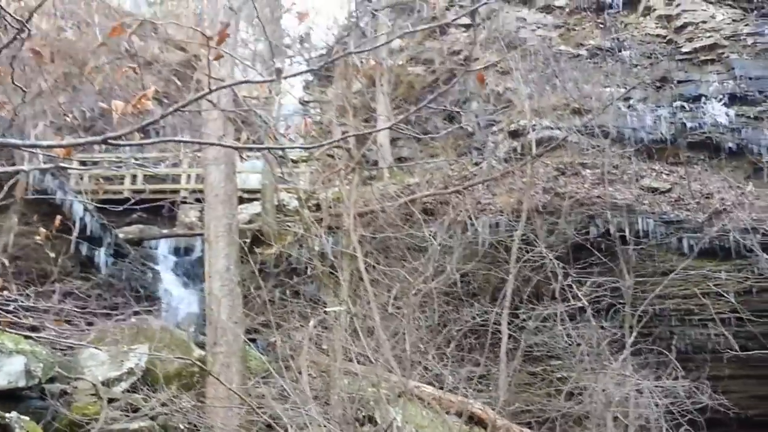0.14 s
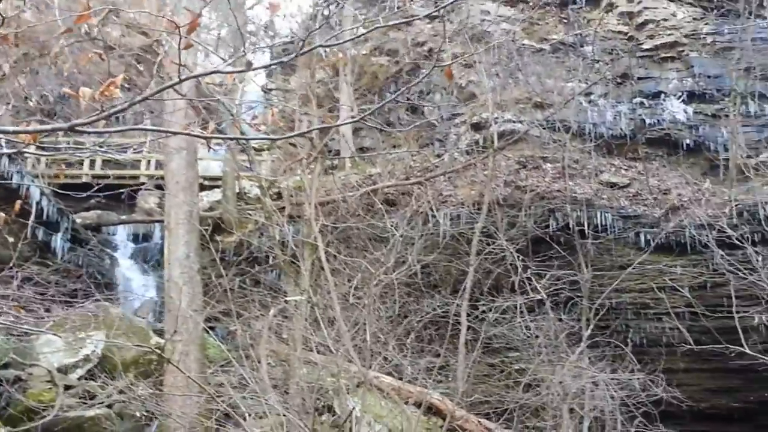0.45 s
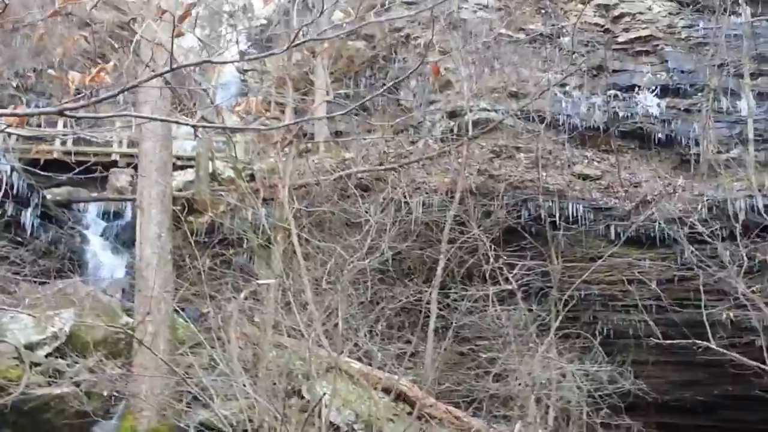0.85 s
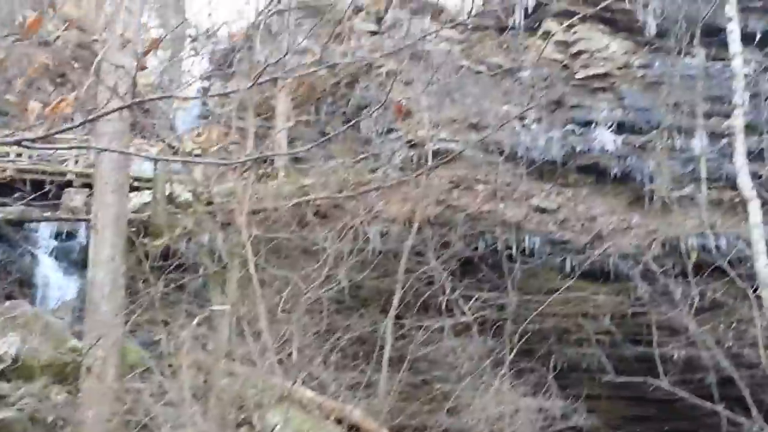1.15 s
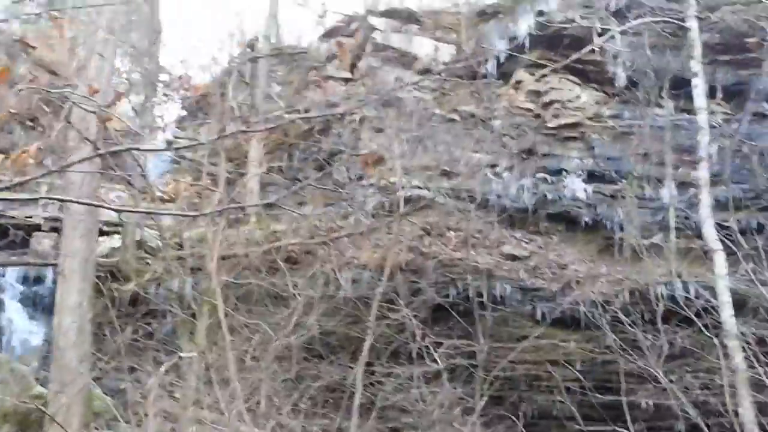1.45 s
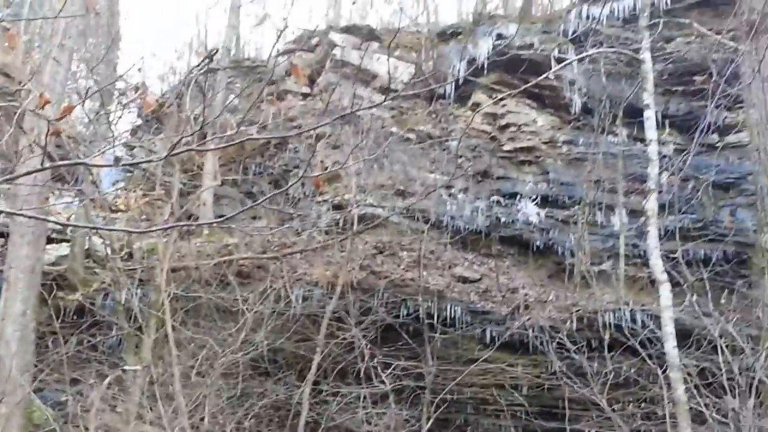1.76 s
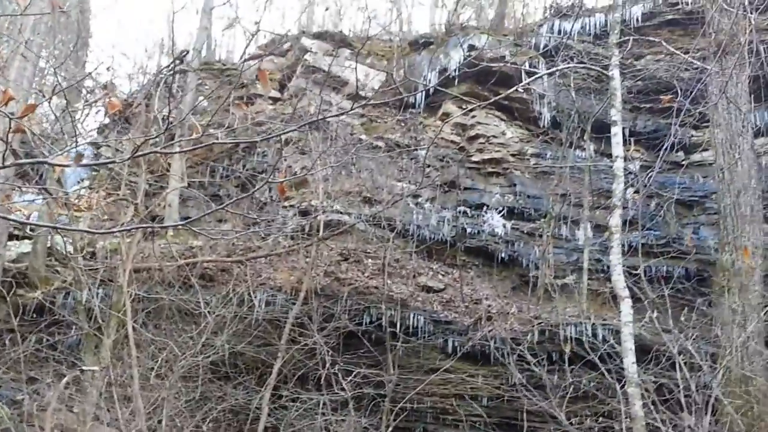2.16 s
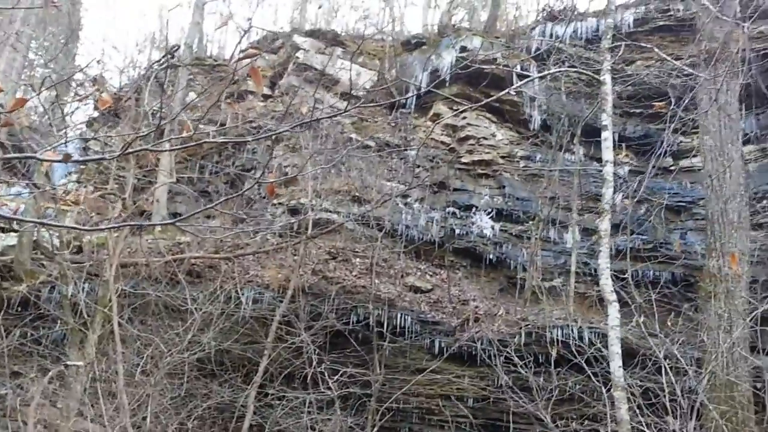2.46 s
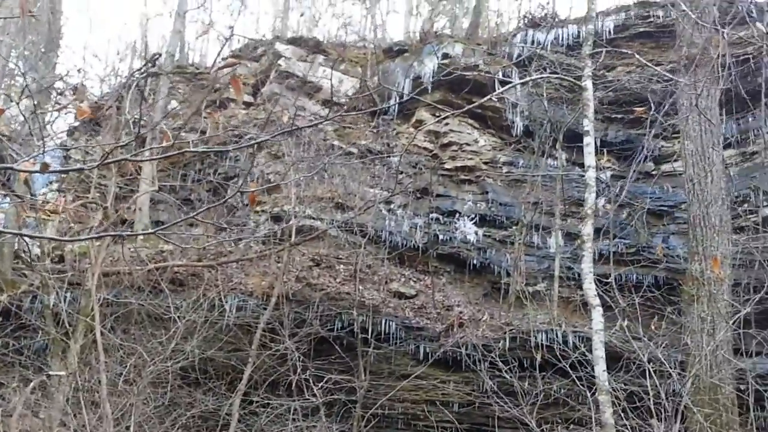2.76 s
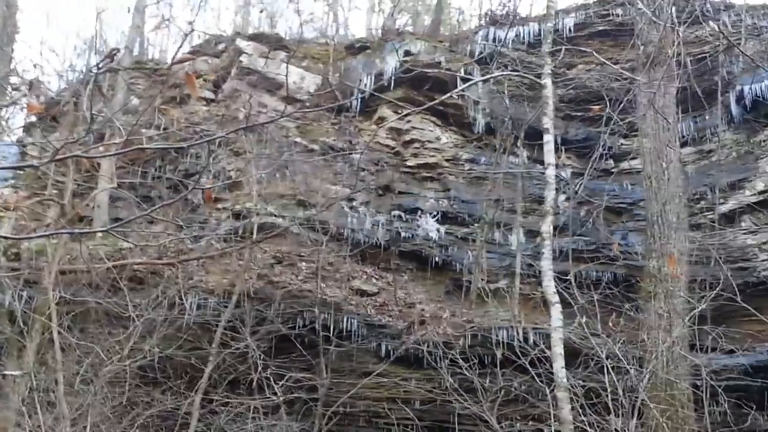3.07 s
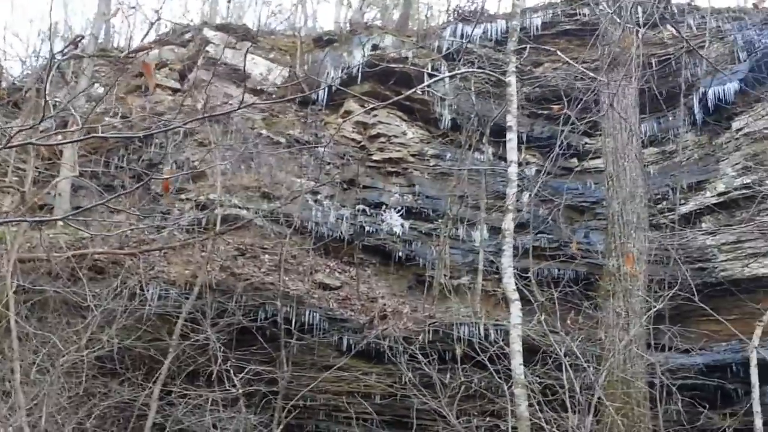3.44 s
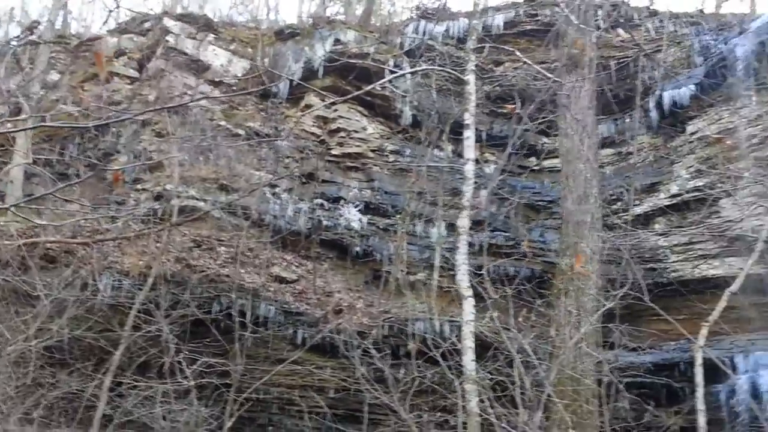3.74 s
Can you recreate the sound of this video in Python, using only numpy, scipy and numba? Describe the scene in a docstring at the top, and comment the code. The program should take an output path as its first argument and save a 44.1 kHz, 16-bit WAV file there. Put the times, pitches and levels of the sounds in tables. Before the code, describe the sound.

A small waterfall pours constantly over rocks in bare winter woods, a dense hissing rush with gurgling bubbles, soft hollow booms and occasional drips; a hand-held stereo microphone slowly turns and catches light wind thumps.

```python
"""A small waterfall pours steadily over rocks, heard from a slowly turning hand-held recorder.
Noise spray and dense rising bubbles come from the fall, the stream below it and off the rock.
Single pitches that swell and die away make big gulping bubbles, a booming hollow and nearby drips.
Low noise and short thumps are light air on the microphone ports.
Each port rings in the treble at its own pitch, and the extreme top is cut."""
import sys
import numpy as np
from scipy import signal
from scipy.fft import rfft, irfft
from scipy.io import wavfile
from scipy.ndimage import map_coordinates
from numba import njit

SR = 44100
rng = np.random.default_rng(int(sys.argv[2]) if len(sys.argv) > 2 else 0)


def unload_audio(sound):
    """Save the sound as a 16-bit wav file, at the path given as the first command line argument."""
    columns = np.transpose(np.atleast_2d(sound))
    # keep every value between -1 and 1, then stretch to whole-number steps
    steps = np.round(np.clip(columns, -1, 1) * 32767)
    wavfile.write(sys.argv[1], SR, steps.astype(np.int16))


N = 171990  # samples, 3.9 s

# Colour of the rushing water before it reaches the ports, with a hollow boom near 240 Hz
# columns: frequency_hz, level_db (per Hz)
WATER_COLOUR = [(45, -125), (90, -85), (125, -74), (190, -68), (220, -65.5), (243, -65.5), (275, -71.5),
                (318, -67.5), (400, -71.5), (470, -68), (750, -68), (1100, -67), (1450, -66.5), (1900, -69),
                (2150, -71.5), (2700, -76), (4000, -79), (10500, -84), (14500, -86.5)]
# Share of the water's power that arrives straight from fall and stream; the rest is scattered
# columns: frequency_hz, direct_share (0-1)
DIRECT_SHARE = [(200, 0.5), (900, 0.58), (1600, 0.85), (2300, 0.7), (3000, 0.48), (4000, 0), (9000, 0.15)]
# The recorder turns: lateness at the left port, and the water's level at each port
# columns: time_s, fall_late_ms, stream_late_ms, left_level_db, right_level_db
TURNING = [(0, 0.4, 0.2, 1.1, -0.6), (.7, .42, 0.13, 0.4, -0.15), (1.6, 0.41, 0.2, 0.5, -0.16),
           (2.7, 0.44, 0.2, 0.5, -0.04), (3.25, 0.46, 0.23, 0.4, -0.66), (3.9, 0.47, 0.24, -0.5, 0)]
# Spectrum shape of air rumbling on the ports; its loudness is set separately
# columns: frequency_hz, relative_level_db (per Hz)
WIND_COLOUR = [(15, -18), (48, 5), (80, 4), (120, -0.5), (220, -28), (600, -70)]
# Strength of the air before puffs and panning
# columns: time_s, level_db
WIND_STRENGTH = [(0, -56), (.07, -55), (.145, -52), (.165, -86), (1.22, -85), (1.28, -58), (1.5, -61),
                 (1.6, -53.5), (1.82, -56), (1.95, -60), (2.13, -59), (2.35, -67), (2.48, -57), (2.57, -75),
                 (2.78, -59), (2.9, -61), (2.94, -72), (3.0, -61), (3.9, -63)]
# The next four tables list single pings; level_db is the level before the swell and decay
# Short buffets of air on the ports
# columns: start_s, pitch_hz, level_db, left_minus_right_db
AIR_BUFFETS = [(.118, 88, -36, 19), (1.335, 70, -36, -14), (1.648, 85, -25.5, 14), (1.79, 80, -30.5, 18),
               (2.095, 74.6, -39, 14), (2.455, 70, -42, -6)]
# Large bubbles that gulp out of the rush
# columns: start_s, pitch_hz, level_db, left_minus_right_db
BUBBLE_GULPS = [(.329, 445, -26, 0), (.478, 564, -23.5, -2), (.811, 1670, -32, -5), (1.303, 1300, -22, 0),
                (1.343, 960, -23, 2), (1.775, 1474, -22.5, -1), (2.002, 318, -24, 5), (2.444, 627, -25, 0),
                (3.028, 1119, -24.5, 4), (3.515, 1679, -30, 9), (3.606, 1040, -24.5, 4),
                (3.615, 435, -26, 2), (3.695, 668, -29, 0)]
# Slugs of water booming in the hollow under the fall
# columns: start_s, pitch_hz, level_db, left_minus_right_db
HOLLOW_BOOMS = [(.42, 239, -27.5, 5), (.73, 224, -31, 3), (1.16, 232.5, -32.5, 9), (2.18, 236, -30, 1),
                (2.84, 227, -29.5, 4), (3.16, 243, -27.5, 3), (3.29, 245.4, -27, 2), (3.76, 225.6, -29, 4)]
# Drips close by
# columns: start_s, pitch_hz, level_db, left_minus_right_db
NEAR_DRIPS = [(.9415, 7580, -33, -7), (1.4732, 6560, -28, -2), (1.6815, 7200, -27.5, -1),
              (1.7046, 4960, -21.5, -2), (1.7483, 6700, -31, -8), (3.026, 5200, -27.5, -1),
              (3.046, 6700, -34, 0)]
# Stereo width: the image opens near 1.9 kHz and narrows just above 2 kHz
# columns: frequency_hz, side_level_db
STEREO_WIDTH = [(1000, 0), (1400, 0), (1900, 3), (2030, -6), (2170, -1), (2450, 0.5)]
# Treble resonance and roll-off of the microphone ports, left row then right row
# columns: resonance_hz, width_hz, lift_db, roll_off_hz
PORT_TONES = [(5360, 1445, 17, 13500), (6770, 1050, 25, 12830)]

# Dense bubbles in all the water; level is relative to the spray noise
BUBBLES_PER_S, BUBBLE_LOW_HZ, BUBBLE_HIGH_HZ = 2500, 247.3, 8990
BUBBLE_CYCLES, BUBBLE_SPREAD_DB, BUBBLE_DB = 46, 3.0, -9
BUBBLE_RISE = 0.1  # fraction by which every bubble's pitch climbs over its life

# Sparser, lower gurgles in the stream
GURGLES_PER_S, GURGLE_LOW_HZ, GURGLE_HIGH_HZ = 220, 223.3, 2393
GURGLE_CYCLES, GURGLE_SPREAD_DB, GURGLE_DB = 28.5, 2, -7.5

# Depth (dB) and corner rate (Hz) of the level wander
SURGE_DB, SURGE_HZ = 0.2, 6.6
SPLASH_LOW_DB, SPLASH_HIGH_DB, SPLASH_HZ = 1.57, 0.3, 11.4  # heavy lumps flicker more than fine spray
PUFF_DB, PUFF_HZ = 2, 12

FALL_SHARE = 0.64  # of the direct power before gurgles; the rest is the stream
PORT_GAP_M, SOUND_M_PER_S = 0.14, 343
WIND_PAN_DB = 11.5  # left minus right

# Time constants of the swell and the decay
BUFFET_ATTACK_S, BUFFET_RING_S = 0.018, 0.013
GULP_ATTACK_S, GULP_RING_S = 0.0048, 0.0058
BOOM_ATTACK_S, BOOM_RING_S = 0.029, 0.028
DRIP_ATTACK_S, DRIP_RING_S = 0.00033, 0.0008

ROLL_OFF_STEEPNESS = 10.6  # exponent of frequency in the port roll-off
TOP_HZ = 14600


def undb(db):
    """Decibels to gain."""
    return 10 ** (np.asarray(db) / 20)


def unit(x):
    """Scale to an rms of one."""
    return x / np.sqrt(np.mean(x ** 2))


def bins():
    """Frequencies of the spectrum in Hz, with zero raised to 1 so logs and ratios work."""
    return np.maximum(np.fft.rfftfreq(N, 1 / SR), 1)


def over_hz(table):
    """Read a table on a log-frequency axis."""
    hz, value = np.array(table, float).T
    return np.interp(np.log(bins()), np.log(hz), value)


def over_time(table, axis=1):
    """Read one column of a table at every sample."""
    rows = np.array(table, float)
    return np.interp(np.arange(N) / SR, rows[:, 0], rows[:, axis])


def walk(corner_hz):
    """Smooth random wander with a spread of one: noise with its fast movement filtered away."""
    smoothing = 1 + (bins() / corner_hz) ** 2
    return unit(irfft(rfft(rng.standard_normal(N)) / smoothing, N))


@njit
def ring(start, hz, size, cycles, rise):
    """Each bubble is a dying sine whose pitch climbs."""
    out = np.zeros(N)
    for k in range(len(start)):
        length = cycles[k] * SR / hz[k]
        for i in range(min(int(length), N - start[k])):
            age = i / length  # 0 to 1 over the bubble's life
            turns = cycles[k] * age * (1 + rise * age / 2)
            out[start[k] + i] += size[k] * np.exp(-5 * age) * np.sin(2 * np.pi * turns)
    return out


def bubbling(per_s, low_hz, high_hz, cycles, spread_db):
    """A swarm of bubbles of random pitch and size, as strong per Hz as unit white noise."""
    when, pitch, strength, life = rng.random((int(per_s * N / SR), 4)).T
    start = (when * N).astype(np.int64)
    hz = low_hz * (high_hz / low_hz) ** pitch
    # strength grows with pitch to keep the swarm even per Hz; a few bubbles stand out
    size = hz * undb(-spread_db * np.log(np.maximum(strength, .01)))
    swarm = ring(start, hz, size, cycles * (.5 + life), BUBBLE_RISE)
    return unit(swarm) * np.sqrt(2 * (high_hz - low_hz) / SR)


def churn():
    """Noise spray and bubbles before colouring; the flow surges and each octave splashes on its own."""
    spray = rng.standard_normal(N)
    swarm = bubbling(BUBBLES_PER_S, BUBBLE_LOW_HZ, BUBBLE_HIGH_HZ, BUBBLE_CYCLES, BUBBLE_SPREAD_DB)
    spectrum = rfft(spray + undb(BUBBLE_DB) * swarm) / np.hypot(1, undb(BUBBLE_DB))
    octave = np.clip(np.log2(bins() / 125), 0, 7)
    splashing = np.zeros(N)
    for k, depth_db in enumerate(np.linspace(SPLASH_LOW_DB, SPLASH_HIGH_DB, 8)):
        crossfade = np.maximum(1 - abs(octave - k), 0)
        band = irfft(spectrum * crossfade, N)
        splashing += band * undb(depth_db * walk(SPLASH_HZ))
    return splashing * undb(SURGE_DB * walk(SURGE_HZ))


def arrive(x, lag_ms):
    """Sound from one side reaches the left port late, by a lag that changes over time."""
    left = map_coordinates(x, [np.arange(N) - lag_ms * SR / 1000], mode="mirror")
    return np.array([left, x])


def scattered():
    """Spectra of water off the rock from all sides: ports agree in the bass, less so higher up."""
    alike = np.sinc(2 * bins() * PORT_GAP_M / SOUND_M_PER_S)  # diffuse-field coherence
    mid = rfft(churn()) * np.sqrt((1 + alike) / 2)
    side = rfft(churn()) * np.sqrt((1 - alike) / 2)
    return np.array([mid + side, mid - side])


def waterfall():
    """The fall, the gurgling stream and their scattered sound, in the colour of rushing water."""
    gurgles = bubbling(GURGLES_PER_S, GURGLE_LOW_HZ, GURGLE_HIGH_HZ, GURGLE_CYCLES, GURGLE_SPREAD_DB)
    stream_mix = np.sqrt(1 - FALL_SHARE) * churn() + undb(GURGLE_DB) * gurgles
    fall = arrive(np.sqrt(FALL_SHARE) * churn(), over_time(TURNING, axis=1))
    stream = arrive(stream_mix, over_time(TURNING, axis=2))
    share = over_hz(DIRECT_SHARE)
    spectrum = np.sqrt(share) * rfft(fall + stream) + np.sqrt(1 - share) * scattered()
    # the root turns unit white noise into 0 dB per Hz
    water = irfft(spectrum * undb(over_hz(WATER_COLOUR)) * np.sqrt(SR / 2), N)
    facing = undb([over_time(TURNING, axis=3), over_time(TURNING, axis=4)])
    return facing * water


def wind():
    """Faint puffs of air: low noise, unrelated at the two ports and stronger on the left."""
    noise = rfft(rng.standard_normal((2, N)))
    rumble = unit(irfft(noise * undb(over_hz(WIND_COLOUR)), N))
    strength = undb(over_time(WIND_STRENGTH) + PUFF_DB * walk(PUFF_HZ))
    return rumble * strength * undb([[WIND_PAN_DB / 2], [-WIND_PAN_DB / 2]])


def pings(table, attack_s, ring_s):
    """Each row swells quickly and dies away on one pitch, panned by level."""
    out = np.zeros((2, N))
    for start_s, hz, level_db, pan_db in table:
        age = np.clip(np.arange(N) / SR - start_s, 0, 20 * ring_s)
        envelope = (1 - np.exp(-age / attack_s)) * np.exp(-age / ring_s)
        ping = envelope * np.sin(2 * np.pi * hz * age)
        out += ping * undb([[level_db + pan_db / 2], [level_db - pan_db / 2]])
    return out


def buffets():
    """Air thumps the ports: low pitches that swell and die within a few cycles."""
    return pings(AIR_BUFFETS, BUFFET_ATTACK_S, BUFFET_RING_S)


def gulps():
    """Large bubbles gulp: each rings briefly on one pitch."""
    return pings(BUBBLE_GULPS, GULP_ATTACK_S, GULP_RING_S)


def booms():
    """Slugs of water set the hollow under the fall ringing low and softly."""
    return pings(HOLLOW_BOOMS, BOOM_ATTACK_S, BOOM_RING_S)


def drips():
    """Nearby drips tick: very short high-pitched rings."""
    return pings(NEAR_DRIPS, DRIP_ATTACK_S, DRIP_RING_S)


def scene():
    """Rushing water with its gulps, booms and drips, and air at the two ports."""
    return waterfall() + wind() + buffets() + gulps() + booms() + drips()


def port(hz, width_hz, lift_db, roll_off_hz):
    """Response of one port: a treble resonance and a steep roll-off above it."""
    f = bins()
    detune = (f / hz - hz / f) * hz / width_hz
    resonance = (undb(lift_db) + 1j * detune) / (1 + 1j * detune)
    return resonance / np.hypot(1, (f / roll_off_hz) ** ROLL_OFF_STEEPNESS)


def record(dry):
    """The recorder sets the stereo width, the ports colour each channel and the top is cut."""
    left, right = rfft(dry)
    mid = (left + right) / 2
    side = (left - right) / 2 * undb(over_hz(STEREO_WIDTH))
    responses = np.array([port(*row) for row in PORT_TONES])
    coloured = irfft(np.array([mid + side, mid - side]) * responses, N)
    top_cut = signal.ellip(12, .1, 80, TOP_HZ, fs=SR, output="sos")
    return signal.sosfilt(top_cut, coloured)


dry = scene()
out = record(dry)
unload_audio(out)
```